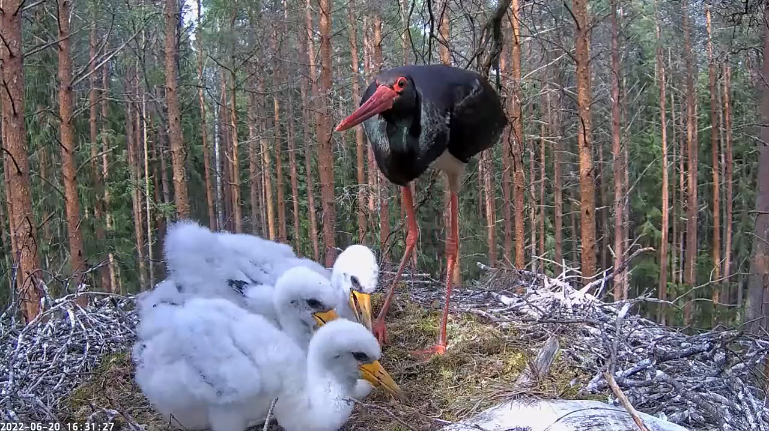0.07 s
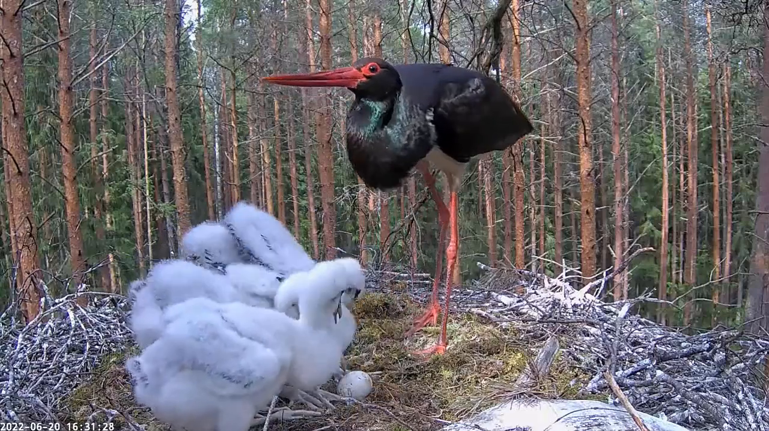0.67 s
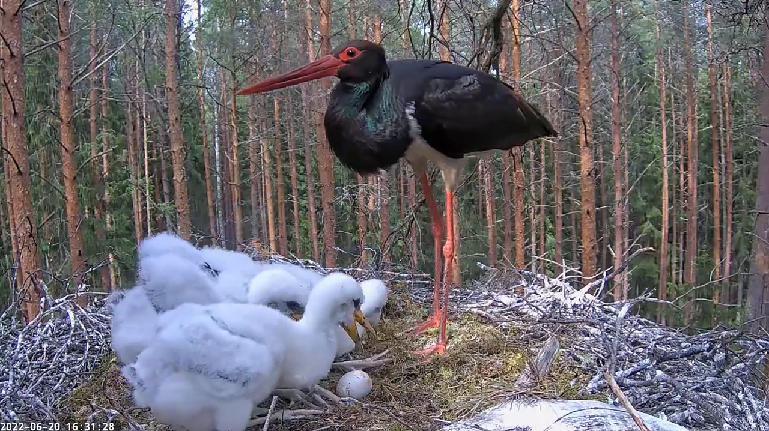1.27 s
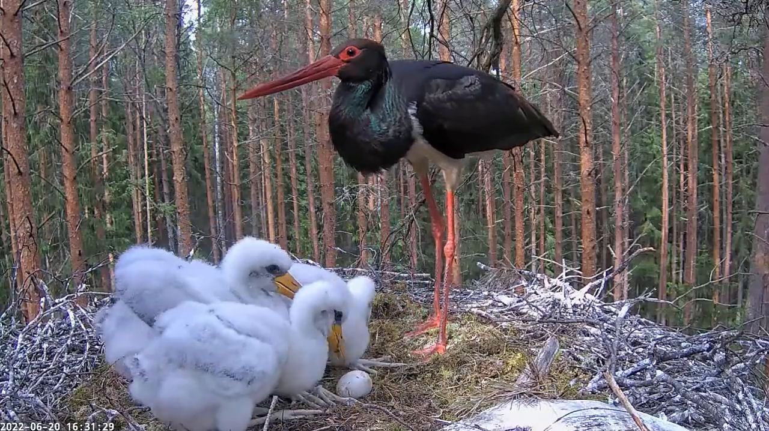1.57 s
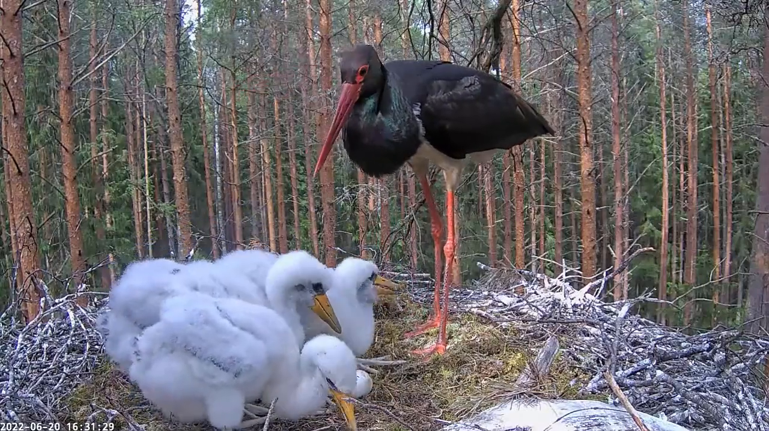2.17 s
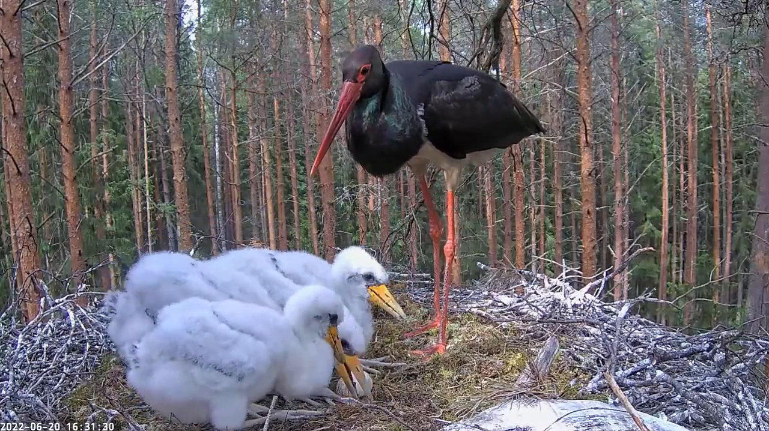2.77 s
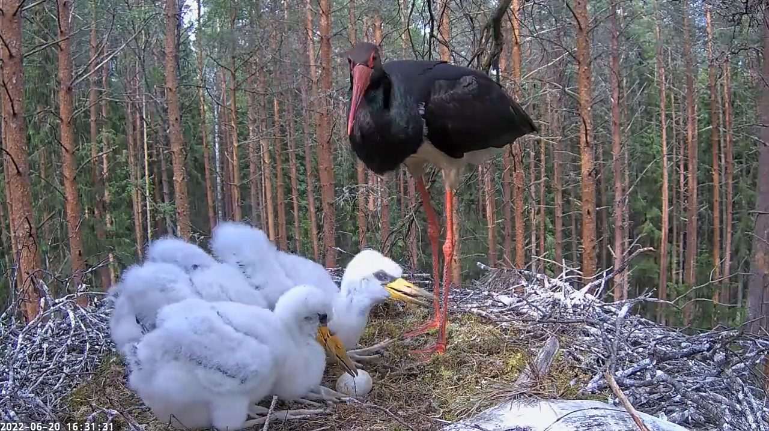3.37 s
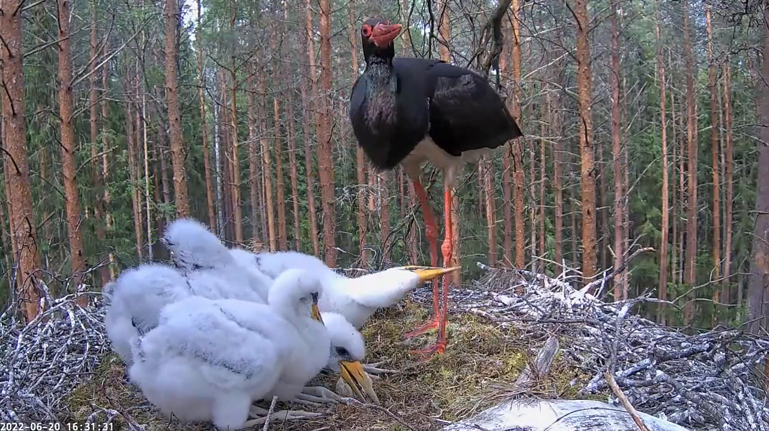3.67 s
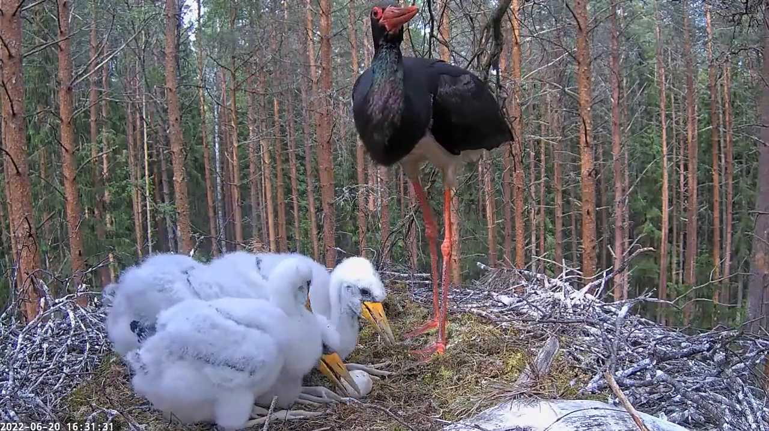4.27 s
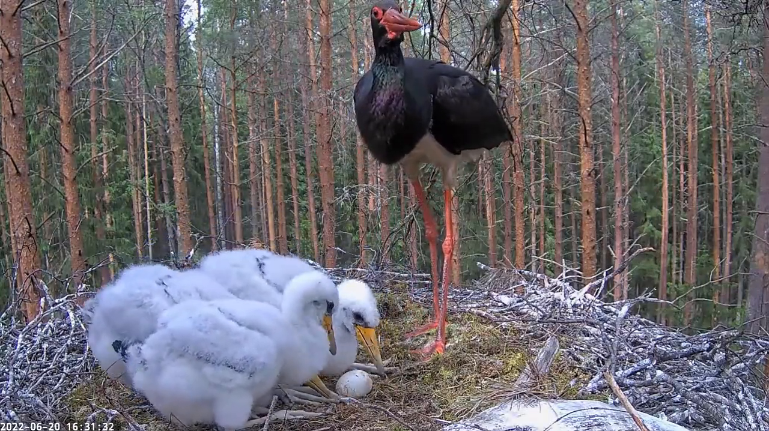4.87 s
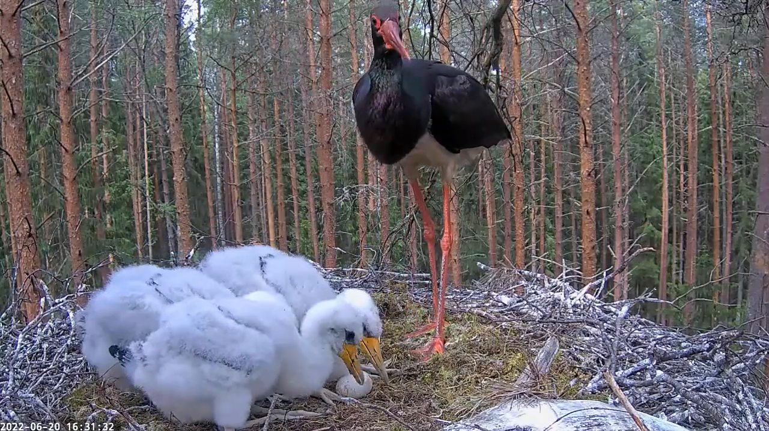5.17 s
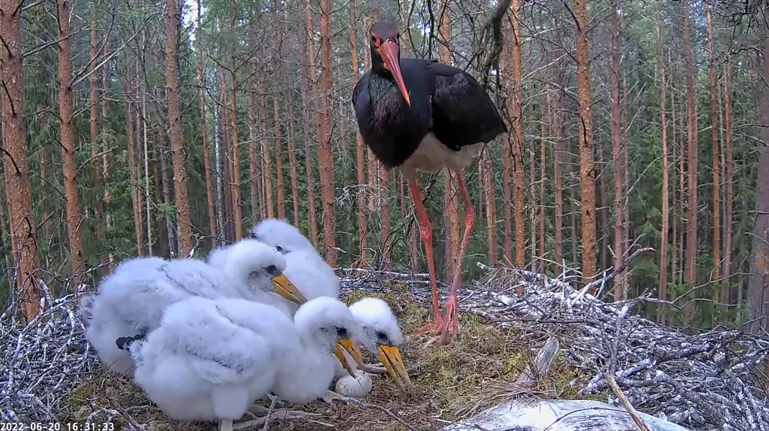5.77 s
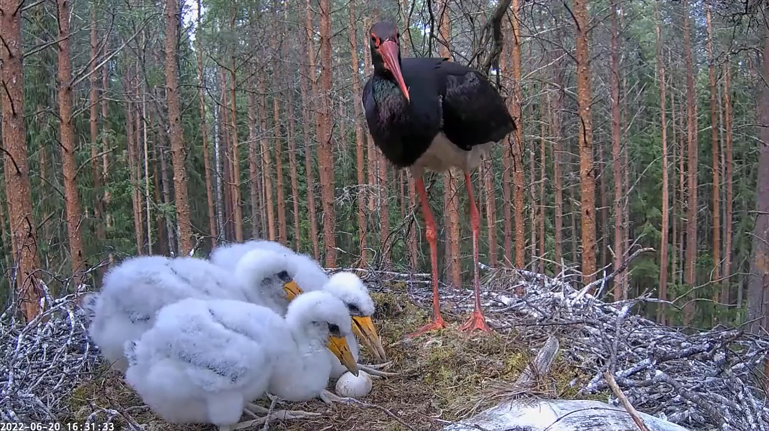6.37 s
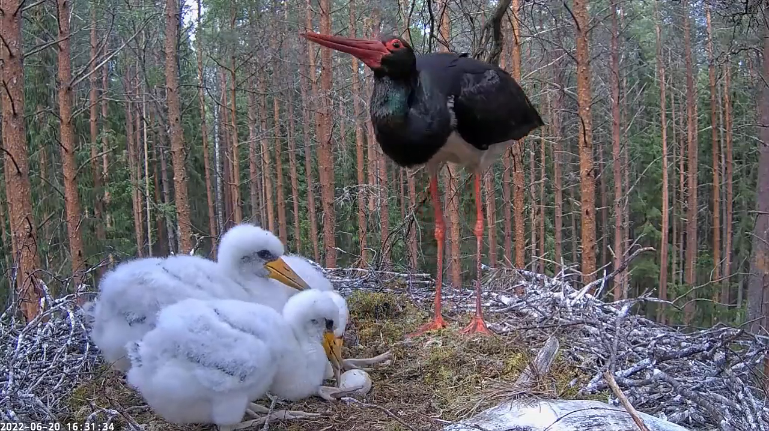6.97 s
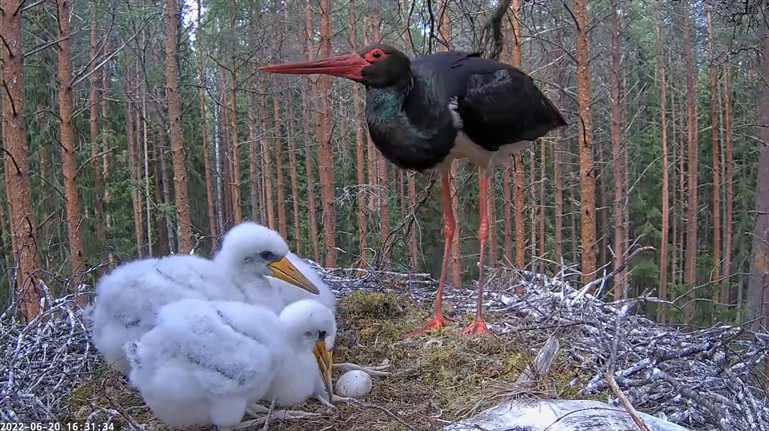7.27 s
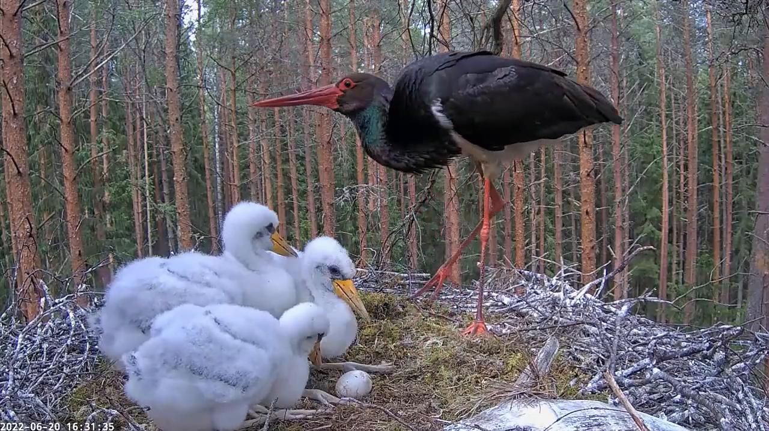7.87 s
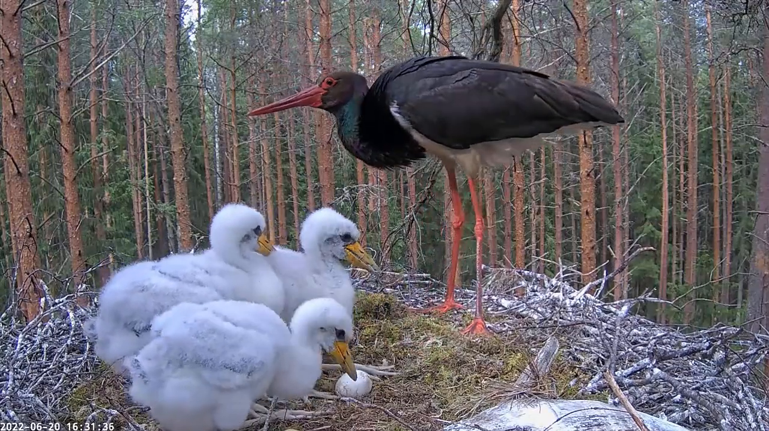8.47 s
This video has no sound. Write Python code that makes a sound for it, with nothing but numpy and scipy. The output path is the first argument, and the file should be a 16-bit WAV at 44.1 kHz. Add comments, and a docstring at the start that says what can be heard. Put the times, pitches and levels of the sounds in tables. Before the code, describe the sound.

Black stork chicks beg close by in bouts of harsh, squealing rasps, with creaks, squeaks and two held hisses over faint forest air.

```python
"""Harsh, squealing rasps, about nine a second: black stork chicks begging in bouts on a treetop nest
in a pine forest, close to the nest camera's microphone. Flapping membranes chop their breath into puffs
that ring the throat. Each rasp, at times with a clear cry in it, rides over a low falling coo and closes
on a creak and a whistled flick. Longer rattles run through or end some calls, amid lone clucks, squeaks
and two held hisses. Behind are faint air in the trees and two low whistles lingering among the trunks."""
import sys
import numpy as np
from scipy import signal
from scipy.fft import rfft, irfft, next_fast_len
from scipy.io import wavfile

SR = 44100
rng = np.random.default_rng(int(sys.argv[2]) if len(sys.argv) > 2 else 0)


def pcm_store(signal):
    """Save signal as 16-bit PCM."""
    levels = np.round(np.clip(np.atleast_2d(signal), -1, 1) * 32767)
    wavfile.write(sys.argv[1], SR, levels.astype(np.int16).T)


N = 379701


def gain_of(db):
    """Decibels to amplitude."""
    return 10 ** (np.asarray(db) / 20)


def unit_rms(x):
    """Scales to rms 1."""
    return x / np.sqrt(np.mean(x ** 2) + 1e-20)


def add(mix, start_s, sound):
    """Lays a sound into the mix."""
    part = mix[max(round(start_s * SR), 0):][:len(sound)]
    part += sound[:len(part)]


def wobble(size, hz):
    """Smooth random motion, of rms about 1, that changes up to hz times a second."""
    padded = next_fast_len(size + 2048, True)
    f = np.fft.rfftfreq(padded, 1 / SR)
    rolloff = np.exp(-np.minimum((f / hz) ** 2, 20))
    return unit_rms(irfft(rfft(rng.standard_normal(padded)) * rolloff, padded))[:size]


def ring(spectrum, size=1024):
    """The causal impulse response, of energy 1, that has a given spectrum."""
    hz, db = np.transpose(spectrum)
    f = abs(np.fft.fftfreq(size, 1 / SR))
    log_gain = np.log(gain_of(np.interp(np.log(f + 1), np.log(hz), db)))
    response = np.fft.ifft(np.exp(np.conj(signal.hilbert(log_gain)))).real
    return response / np.linalg.norm(response)


def progress(length):
    """Runs from 0 to 1 over a length in seconds."""
    return np.linspace(0, 1, max(round(length * SR), 128))


def swell(u, rise, fall):
    """An envelope of rms 1; rise and fall are shares of its length."""
    ramp = np.clip(np.minimum(u / rise, (1 - u) / fall), 0, 1)
    return unit_rms(np.sin(np.pi / 2 * ramp) ** 2)


# The air in the pines around the nest. Each row: frequency in Hz, relative level in dB.
FOREST_SPECTRUM = [(25, -5), (90, -16), (300, -11.5), (1000, -20.5), (3000, -24), (6000, -30), (15000, -35)]


def forest_air(db=-68):
    """Faint steady air in the trees, mostly rumble."""
    air = signal.oaconvolve(rng.standard_normal(N + 8192), ring(FOREST_SPECTRUM, size=8192), "valid")
    return gain_of(db) * unit_rms(air[:N])


def trunk_echoes(x, t60, echo_db):
    """Scattered echoes that come back to the microphone from the trunks."""
    t = np.arange(SR // 2) / SR
    taps = rng.standard_normal(len(t)) * (rng.random(len(t)) < .05)
    taps = taps * (t > .015) * gain_of(-60 * t / t60)
    band = signal.butter(1, [900, 5000], "bandpass", fs=SR, output="sos")
    taps = signal.sosfilt(band, taps / np.linalg.norm(taps))
    return gain_of(echo_db) * signal.oaconvolve(x, taps)[:N]


def squeak(length, first_hz, last_hz, db, arch=2.235, quaver=.019, grit=.32, flutter_db=3, skirt_s=.004):
    """A thin whistle, as (delay, sound): it arches higher the longer it lasts, and is roughest low down."""
    span = length + 2 * skirt_s
    u = progress(span)
    along = np.clip((u * span - skirt_s) / length, -.2, 1.2)
    bow = 1 - (2 * along - 1) ** 2
    glide_hz = first_hz + (last_hz - first_hz) * along
    hz = glide_hz * (1 + arch * length * bow) * (1 + quaver * wobble(len(u), hz=500))
    roughness = grit * (hz.mean() / hz) ** 2 * wobble(len(u), hz=880)
    flutter = gain_of(flutter_db * np.tanh(wobble(len(u), hz=200)))
    tone = np.sin(2 * np.pi * np.cumsum(hz) / SR) * (1 + roughness) * flutter
    return -skirt_s, gain_of(db) * unit_rms(tone * swell(u, rise=.25, fall=.48))


# Two low whistles among the trunks, and the chicks' squeaks close to the microphone.
# Each row: start and length in seconds, first and last pitch in Hz, relative level in dB.
LOW_WHISTLES = [(4.666, 0.059, 933, 1322, -52.5), (8.0, 0.046, 1022, 1065, -54)]
CHICK_SQUEAKS = [(0.441, 0.02, 2650, 3700, -43), (1.41, 0.034, 3300, 3460, -43),
                 (1.659, 0.018, 3100, 2250, -44), (2.11, 0.035, 1550, 1800, -53),
                 (2.261, 0.023, 2150, 3200, -42), (2.388, 0.046, 3070, 3100, -60.5),
                 (2.523, 0.02, 1920, 3600, -51.5), (2.544, 0.039, 3750, 2270, -56.5),
                 (2.932, 0.025, 3100, 2750, -43.5), (3.039, 0.019, 3800, 4600, -47.5),
                 (3.091, 0.029, 4400, 3210, -52), (3.197, 0.031, 4300, 3570, -47),
                 (3.246, 0.015, 1896, 1700, -47.5), (3.31, 0.025, 4100, 3200, -51),
                 (4.596, 0.02, 2700, 3600, -39.5), (5.262, 0.03, 3300, 3380, -46),
                 (5.42, 0.035, 3800, 3750, -56), (5.89, 0.04, 3600, 2950, -47),
                 (6.005, 0.037, 3700, 2940, -47), (6.127, 0.019, 4050, 2360, -48),
                 (6.48, 0.032, 3500, 3270, -47), (8.126, 0.025, 4400, 3850, -46.5),
                 (8.339, 0.027, 3050, 3450, -44.5)]


def whistles(rows):
    """Single gliding whistles, one to a row."""
    mix = np.zeros(N)
    for start, length, first_hz, last_hz, db in rows:
        delay, sound = squeak(length, first_hz, last_hz, db)
        add(mix, start + delay, sound)
    return mix


# A chick's throat as it creaks. Each row: frequency in Hz, relative level in dB.
CREAK_SPECTRUM = [(70, -24), (135, -3.5), (280, 9), (450, -6), (720, 0.5), (1450, 1), (2000, -3),
                  (3400, -12), (4600, -28), (15000, -59)]


def creak(length, rate_hz, db, slowing=.4, jitter=.06, spread_db=4.0, air=.11, hollow=2.1):
    """Separate throat pulses, slowing down, each followed by a little air."""
    u = progress(length)
    pulse_hz = rate_hz * np.exp(slowing * (.5 - u) + jitter * wobble(len(u), hz=143.3))
    turns = np.cumsum(pulse_hz) / SR
    pulses = np.diff(np.floor(turns), prepend=-1) * gain_of(spread_db * wobble(len(u), hz=206))
    breath = air * np.exp(-(turns % 1) / .67) * rng.standard_normal(len(u))
    sound = signal.fftconvolve(pulses + breath, ring(CREAK_SPECTRUM))
    # the throat's hollow resonance shifts from call to call
    hollow_hz = 740 * np.exp(.19 * rng.standard_normal())
    sound = sound + hollow * signal.lfilter(*signal.iirpeak(hollow_hz, 6, fs=SR), sound)
    return gain_of(db) * sound * np.sqrt(len(u) / np.sum(sound ** 2))


# The chicks' throat creaks on the nest, close by.
# Each row: start and length in seconds, pulse rate in Hz, level in dB before the trim.
THROAT_CREAKS = [(0.0, 0.043, 204, -49), (0.066, 0.067, 129, -49.5), (0.268, 0.013, 200, -53),
                 (0.423, 0.018, 133, -52), (0.571, 0.063, 173, -51.5), (0.909, 0.012, 130, -51),
                 (1.102, 0.066, 182, -48.5), (1.194, 0.016, 231, -54.5), (1.24, 0.012, 180, -56),
                 (1.385, 0.02, 199, -51), (1.453, 0.01, 193, -51), (2.056, 0.041, 251, -50),
                 (2.174, 0.1, 217, -50), (2.299, 0.045, 100, -52.5), (2.501, 0.015, 133, -54.5),
                 (3.237, 0.026, 221, -51), (3.435, 0.012, 205, -51.5), (3.497, 0.028, 150, -51.5),
                 (3.631, 0.0074, 200, -51), (3.727, 0.019, 151, -52.5), (3.992, 0.0062, 195, -45.5),
                 (4.181, 0.032, 89, -53), (4.264, 0.046, 109, -55), (4.368, 0.016, 200, -52),
                 (4.579, 0.0061, 154, -55), (4.61, 0.0048, 216, -49), (5.225, 0.057, 181, -50.5),
                 (5.348, 0.035, 82, -52.5), (5.56, 0.0032, 200, -45.5), (5.647, 0.094, 159, -52),
                 (6.173, 0.039, 219, -51), (6.269, 0.089, 202, -50), (6.623, 0.012, 201, -49.5),
                 (6.76, 0.0087, 193, -48), (7.244, 0.045, 149, -48), (7.968, 0.029, 177, -47),
                 (8.076, 0.032, 150, -48), (8.225, 0.015, 120, -46), (8.269, 0.074, 219, -48.5)]


def throat_creaks(trim_db=1.5):
    """The chicks' throat creaks: long rattles in or ending calls, and short lone clucks."""
    mix = np.zeros(N)
    for start, length, rate_hz, db in THROAT_CREAKS:
        add(mix, start, creak(length, rate_hz, db + trim_db))
    return mix


def puffs(size, hz, jitter, open_share, leak):
    """Air chopped into uneven puffs by flapping membranes."""
    turns = np.cumsum(hz * np.exp(jitter * wobble(size, hz))) / SR
    return (leak + np.exp(-(turns % 1) / open_share)) * rng.standard_normal(size)


# A chick's throat as it hisses. Each row: frequency in Hz, relative level in dB.
HISS_SPECTRUM = [(150, -52), (820, -17), (1100, -7.5), (1750, -16), (2050, -13.5), (2400, 0.5),
                 (3000, -0.5), (3700, -7), (4250, -12), (5500, -29), (6700, -62), (8400, -35.5),
                 (15000, -38)]
# The bill during the first hiss. Each row: time in seconds, opening on a scale of 0 to 1.
BILL_GAPE = [(3.65, 0), (3.92, 0.6), (4.15, 0.37), (4.4, 0)]
# Two held hisses near the microphone.
# Each row: start, full strength, release and end in seconds, held level in dB.
HELD_HISSES = [(2.3, 3.65, 3.95, 4.5, -46.7), (6.65, 6.9, 7.85, 8.4, -46.5)]


def hisses(flutter_db=2, gape_hz=4400, gape_gain=1.34, fade_db=-23):
    """Long throaty hisses that rattle a little; the first brightens as the bill opens."""
    t = np.arange(N) / SR
    air = puffs(N, hz=267, jitter=.47, open_share=.14, leak=1.0)
    air = air * gain_of(flutter_db * wobble(N, hz=79.5))
    sound = signal.oaconvolve(air, ring(HISS_SPECTRUM))[:N]
    bright = signal.lfilter(*signal.iirpeak(gape_hz, 5, fs=SR), sound)
    sound = sound + gape_gain * np.interp(t, *np.transpose(BILL_GAPE)) * bright
    effort = sum(gain_of(db + np.interp(t, times, [fade_db, 0, 0, fade_db], left=-np.inf, right=-np.inf))
                 for *times, db in HELD_HISSES)
    return effort * unit_rms(sound)


def coo(length, db, pitch_hz=474, sag=.1646, split=.63, roll_db=-5, nasal_db=2):
    """A low nasal tone that holds, then sags and often breaks into half its pitch as the call ends."""
    u = progress(length)
    droop, breaking = rng.uniform(.48, 1.5, 2)
    held_hz = pitch_hz * (1 + .04 * rng.standard_normal())
    hz = held_hz * (1 - sag * droop * u ** 1.354 + .0075 * wobble(len(u), hz=200))
    phase = 2 * np.pi * np.cumsum(hz) / SR
    weights = {k: gain_of(roll_db * max(k - 2, 0) + nasal_db * (k > 1)) for k in range(1, 6)}
    harmonics = sum(weight * np.cos(k * phase) for k, weight in weights.items())
    halves = sum(weight * np.cos((k - .5) * phase) for k, weight in weights.items())
    tone = harmonics + 2 * split * breaking * u ** 3 * halves
    return gain_of(db) * unit_rms(tone * swell(u, rise=.46, fall=.13))


def squeal(u, hz, flare=.14, wander=.14, rough=.0588, flutter_db=4, reach=.3998):
    """An unstable whistle: it dives in, tumbles about its pitch, and flicks up as the breath ends."""
    edges = flare * (2 * u - 1) ** 4
    # the membranes can only be stretched so far
    stretch = reach * np.tanh((edges + wander * wobble(len(u), hz=70.5)) / reach)
    pitch = hz * np.exp(stretch + rough * wobble(len(u), hz=856))
    flutter = gain_of(flutter_db * np.tanh(wobble(len(u), hz=350)))
    return unit_rms(np.sin(2 * np.pi * np.cumsum(pitch) / SR) * flutter)


# A chick's throat as it rasps. Each row: frequency in Hz, relative level in dB.
RASP_SPECTRUM = [(100, -51), (400, -13), (850, -17.5), (1400, -11.5), (1850, -13), (2450, 2.5),
                 (3350, -1.5), (3900, -12.5), (4600, -17), (5900, -21), (7200, -44), (9500, -33),
                 (15000, -34)]


def rasp(length, db, pitch_hz, slur, flutter_db=3.5, overhang=1.1, squeal_db=1.2, hollow=1.4, accent=.35):
    """A harsh burst: a rough squeal, and puffs of air that ring the throat and deepen as it opens."""
    u = progress(length * overhang)
    air = puffs(len(u), hz=456, jitter=.12, open_share=.25, leak=.4)
    air = air * gain_of(flutter_db * wobble(len(u), hz=88))
    air = unit_rms(signal.fftconvolve(air, ring(RASP_SPECTRUM))[:len(u)])
    low = signal.sosfiltfilt(signal.butter(2, 1900, fs=SR, output="sos"), air)
    # the throat's middle resonance sits somewhere else in each call
    throat_hz = 1600 * np.exp(.17 * rng.standard_normal())
    throat = signal.lfilter(*signal.iirpeak(throat_hz, 8, fs=SR), air)
    opening = 1.3 * np.sin(np.pi * u ** 2) - .5
    air = air + low * opening + hollow * throat
    # pent-up pressure makes a clipped call start with a jolt; a slurred one starts softly
    jolt = 1 + accent * (1 - slur) * np.exp(-u / .091)
    push = swell(u, rise=.027 + .15 * slur, fall=.27) * jolt
    return gain_of(db) * unit_rms((air + gain_of(squeal_db) * squeal(u, pitch_hz)) * push)


def begging_call(length, pitch_hz, slur, rasp_db, coo_db, cry_db, flick_db, creak_db):
    """One call as (delay, sound) parts: a rasp with a clear cry and a coo, then a creak and a flick."""
    low, high, above = np.exp(.055 * rng.standard_normal(3))  # pitch scatter from call to call
    dive_delay, dive = squeak(length=.02, first_hz=3850 * above, last_hz=2750, db=flick_db - 3)
    cry_delay, cry = squeak(length=.52 * length, first_hz=.975 * pitch_hz, last_hz=1.025 * pitch_hz,
                            db=cry_db, arch=1.9, quaver=.012, grit=.36)
    flick_delay, flick = squeak(length=.024, first_hz=2850 * low, last_hz=3550 * high,
                                db=flick_db, arch=6.5, quaver=.024, grit=.38)
    # a slurred call enters on a diving whistle; its rasp starts early and lasts longer
    return [(dive_delay - .011, slur * dive),
            (-.009 * slur, rasp(length * (1 + .3 * slur), rasp_db, pitch_hz, slur)),
            (.13 * length + cry_delay, cry),
            (.35 * length, coo(.61 * length, coo_db)),
            (.6 * length, creak(length=.026, rate_hz=205, db=creak_db)),
            (.8 * length + flick_delay, flick)]


# Begging bouts right by the microphone; bouts that overlap are two chicks taking turns.
# Each row: first call, last call and nominal call length in seconds, voice pitch in Hz, slur from
# 0 (clipped) to 1 (slurred), then levels of rasp, coo, cry, flick and creak in dB before the trims.
BEGGING_BOUTS = [(0.0, 0.062, .064, 3050, .2, -42.3, -57, -49, -58, -62),
                 (0.352, 0.352, .045, 2600, .5, -61, -80, -75, -60, -80),
                 (0.485, 0.59, .068, 3050, .8, -44.5, -55, -55, -45.5, -56),
                 (0.699, 0.699, .078, 3050, .1, -44, -62, -55, -52, -65),
                 (0.813, 0.813, .07, 3150, .6, -47.5, -63, -36.5, -46, -70),
                 (0.908, 0.908, .075, 2850, 0, -42, -57, -39, -50, -65),
                 (1.006, 1.06, .062, 2900, .8, -43, -62, -45, -50, -65),
                 (1.464, 2.15, .06, 2950, .7, -46, -55, -60, -44, -58),
                 (1.535, 2.225, .068, 2700, .9, -46, -62, -56, -50, -66),
                 (2.585, 2.585, .04, 2550, .8, -52, -70, -60, -42, -52),
                 (2.675, 2.675, .06, 3150, 0, -42, -53, -48, -50, -60),
                 (2.77, 2.99, .08, 3150, .7, -44, -56, -45, -52, -55),
                 (3.11, 3.11, .066, 3100, .3, -45.5, -60, -48, -50, -52),
                 (3.203, 3.45, .06, 3000, .7, -50.5, -60, -46.5, -57, -60),
                 (3.793, 4.217, .064, 3000, .9, -46, -52, -55, -49.5, -53),
                 (4.317, 4.317, .06, 2800, .8, -52, -67, -65, -66, -62),
                 (4.65, 4.753, .076, 3000, 0, -41.8, -60, -48, -47, -58),
                 (4.866, 5.091, .066, 3080, 0, -42.5, -60, -37.5, -48, -56),
                 (5.19, 5.284, .064, 3020, .7, -44, -57, -40.5, -49, -65),
                 (5.384, 5.384, .046, 2750, .2, -46, -57, -52, -56, -65),
                 (5.476, 5.584, .058, 2750, 0, -42.5, -58, -46, -46, -65),
                 (5.648, 5.648, .055, 2900, .7, -45, -75, -60, -42, -65),
                 (5.727, 5.829, .072, 2750, 0, -43, -59, -53, -48, -53),
                 (5.931, 6.142, .079, 2700, .5, -42.3, -54, -50, -54, -53),
                 (6.226, 6.226, .074, 2700, 1, -45.5, -56, -43, -60, -65),
                 (6.297, 6.297, .066, 2600, .8, -44, -60, -60, -53, -65),
                 (6.42, 6.526, .058, 3000, 0, -48.5, -51, -60, -54, -55),
                 (6.692, 6.791, .052, 2700, 0, -44, -59, -47, -52, -65),
                 (6.9, 6.9, .07, 2650, .8, -43, -70, -46, -43, -53),
                 (7.007, 7.206, .066, 2700, .1, -42.5, -59, -37.5, -47, -65),
                 (7.33, 7.556, .068, 2850, .9, -44, -52, -52, -46, -58),
                 (7.665, 7.885, .075, 2850, .9, -44.5, -52, -42, -47, -58),
                 (8.05, 8.05, .058, 2800, .8, -44, -69, -60, -52, -60),
                 (8.146, 8.244, .078, 2720, .8, -42.5, -53, -38.5, -46, -58),
                 (8.394, 8.509, .058, 2950, 0, -46, -52.5, -60, -47, -56)]


def begging(calls_per_s=9.3, uneven_db=.5):
    """The chicks fill each bout with like calls at an even pace, each a little different in level."""
    mix = np.zeros(N)
    trims_db = np.array([-2.4, -.6, -1, -1, 1.5])  # rasp, coo, cry, flick, creak
    for first, last, length, pitch_hz, slur, *levels_db in BEGGING_BOUTS:
        count = 1 + round((last - first) * calls_per_s)
        for start in np.linspace(first, last, count):
            parts_db = levels_db + trims_db + uneven_db * rng.standard_normal()
            for delay, sound in begging_call(length, pitch_hz, slur, *parts_db):
                add(mix, start + delay, sound)
    return mix


def scene(squeak_db=-1):
    """Mono, from the nest: the chicks close and nearly dry, echoes and forest air behind them."""
    chicks = begging() + hisses() + gain_of(squeak_db) * whistles(CHICK_SQUEAKS) + throat_creaks()
    low_whistles = whistles(LOW_WHISTLES)
    echoes = trunk_echoes(chicks, t60=.15, echo_db=-17.5) + trunk_echoes(low_whistles, t60=.57, echo_db=-1)
    return (chicks + low_whistles + echoes + forest_air())[None]


# The nest camera's faint metallic copies of what reaches its microphone.
# Each row: upward shift in Hz, level in dB against the dry sound.
CAMERA_COPIES = [(4000, -24), (6000, -34), (8000, -29.5), (12000, -34.5)]


def record(dry, grit_db=-32, edge_hz=15850):
    """The camera adds shifted copies and a grit that rides on the signal, then cuts the highest treble."""
    t = np.arange(N) / SR
    analytic = signal.hilbert(dry)
    copies = sum(gain_of(db) * (analytic * np.exp(2j * np.pi * hz * t)).real for hz, db in CAMERA_COPIES)
    grit = gain_of(grit_db) * dry * rng.standard_normal(N)
    band_limit = signal.firwin(511, edge_hz, window=("kaiser", 9), fs=SR)
    return signal.oaconvolve(dry + copies + grit, band_limit[None], "same")


dry = scene()
out = record(dry)
pcm_store(out)
```